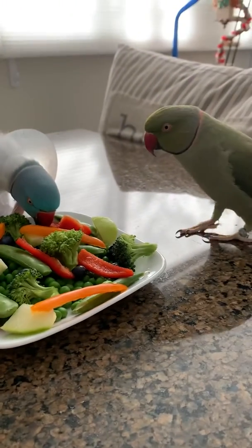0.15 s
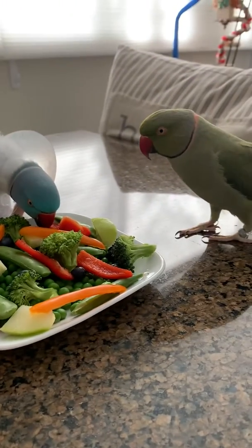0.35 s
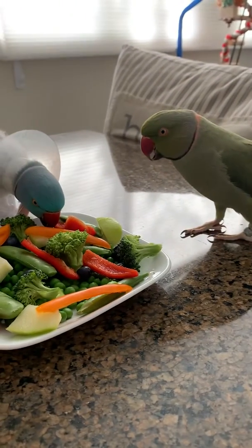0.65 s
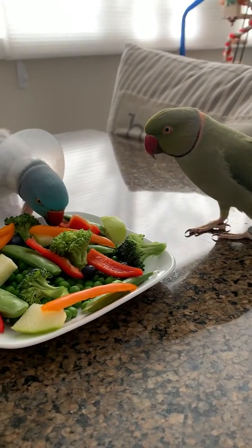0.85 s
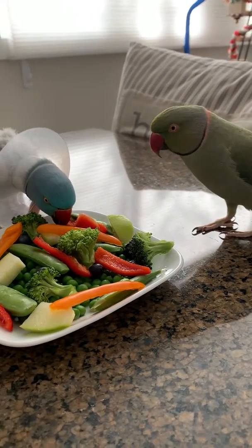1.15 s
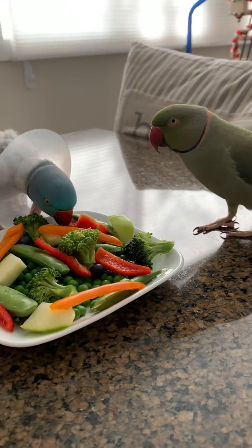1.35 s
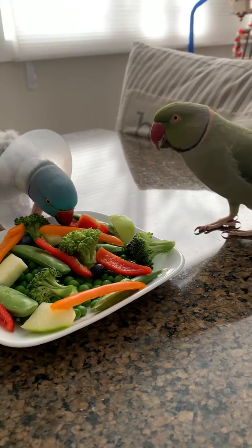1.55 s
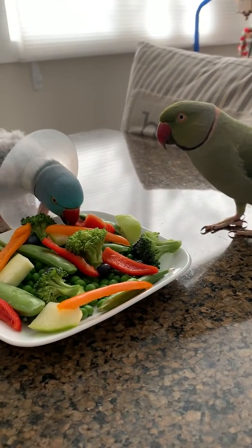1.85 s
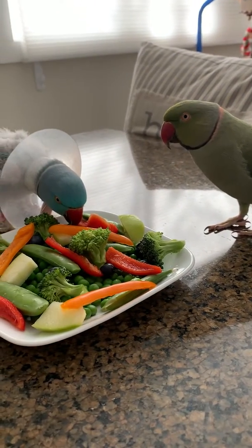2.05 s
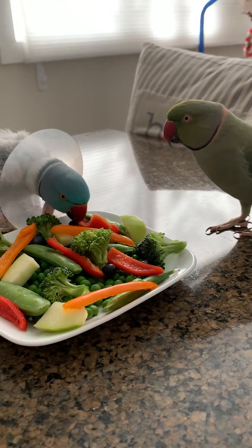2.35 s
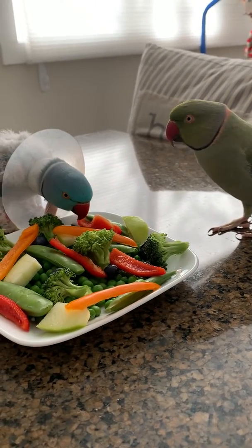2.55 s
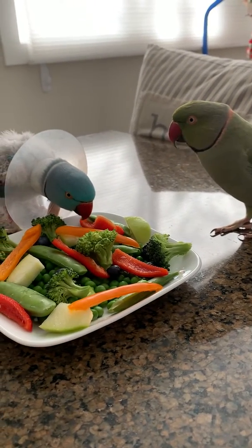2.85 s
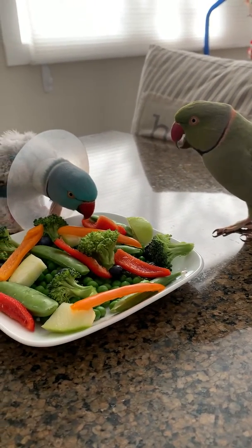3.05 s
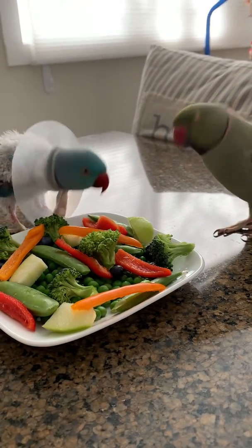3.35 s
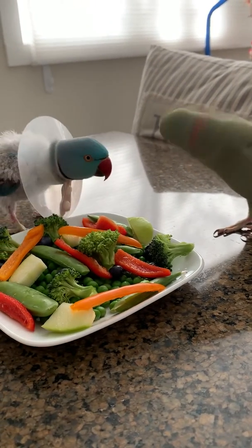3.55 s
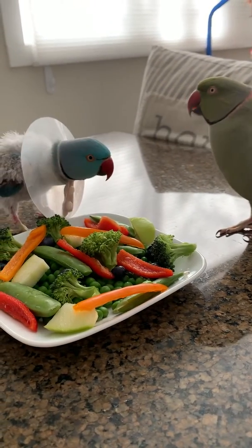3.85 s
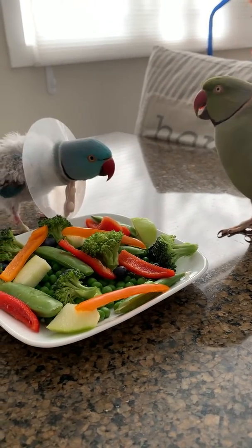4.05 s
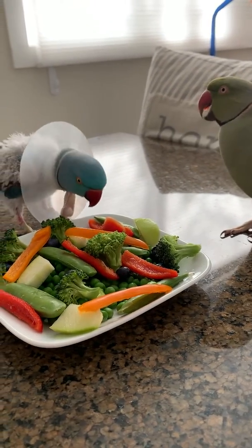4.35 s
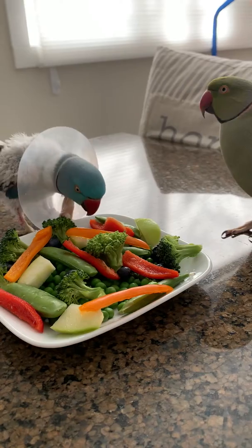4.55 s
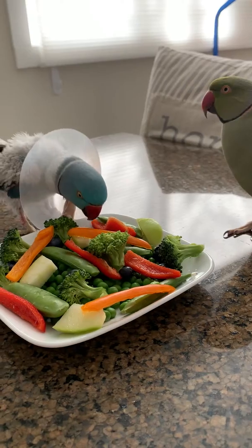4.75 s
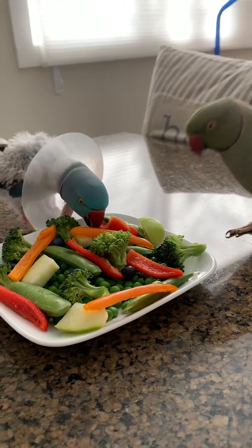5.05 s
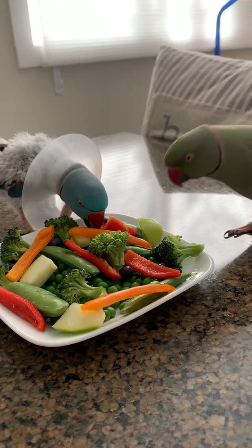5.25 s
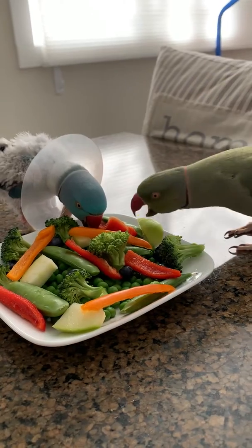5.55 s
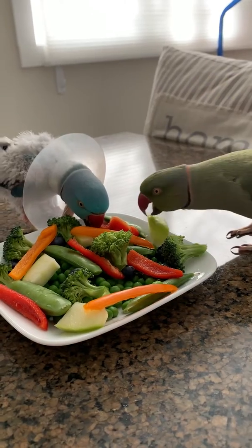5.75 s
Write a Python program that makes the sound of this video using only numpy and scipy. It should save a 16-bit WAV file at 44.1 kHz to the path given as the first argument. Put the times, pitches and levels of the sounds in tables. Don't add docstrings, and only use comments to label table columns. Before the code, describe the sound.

Close parrot calls, from soft peeps to a wide high squawk and a short rattle, with beak clicks, dish knocks and low fan hum.

```python
import sys
import numpy as np
from scipy import signal
from scipy.fft import rfft, irfft, next_fast_len
from scipy.io import wavfile
from scipy.ndimage import uniform_filter1d

SR = 44100
rng = np.random.default_rng(int(sys.argv[2]) if len(sys.argv) > 2 else 0)


def boost_factor(decibels):
    exponent = np.asarray(decibels, float) / 20
    return 10 ** exponent


def to_wav(s):
    ch = np.atleast_2d(s).T
    pcm = np.round(np.clip(ch, -1, 1) * 32767)
    wavfile.write(sys.argv[1], SR, pcm.astype(np.int16))


N = 259308


def rms_one(x):
    return x / np.sqrt(np.mean(x ** 2) + 1e-20)


def at_hz(points, hz):
    p = np.array(points, float)
    return np.interp(np.log(np.maximum(hz, 1)), np.log(p[:, 0] + 1), p[:, 1])


def stretch(rows):
    s, *columns = np.transpose(rows)
    t = np.arange(round(s[0] * SR), min(round(s[-1] * SR), N))
    return t[0], [np.interp(t / SR, s, c) for c in columns]


def drift(size, rate_hz):
    r = np.exp(-2 * np.pi * rate_hz / SR)
    return rms_one(signal.lfilter([1], [1, -2 * r, r * r], rng.standard_normal(size + 4000))[4000:])


def coloured(x, spectrum):
    size = next_fast_len(x.shape[-1] + 1024)
    gain = boost_factor(at_hz(spectrum, np.fft.rfftfreq(size, 1 / SR)))
    return irfft(rfft(x, size) * gain, size)[..., :x.shape[-1]]


def fade(size, seconds):
    ramp = np.minimum(np.arange(size), np.arange(size)[::-1]) / (seconds * SR)
    return np.minimum(ramp, 1)


def add(out, at, x):
    out[at:at + len(x)] += x[:len(out) - at]


# pitch_hz, level_db per Hz
ROOM_TONE = [(15, -33), (25, -3.5), (59, -4.5), (354, -3), (488, -11.5), (543, -14), (729, -17),
             (1630, -19.5), (1910, -22.5), (2300, -27.5), (3440, -30.5), (5420, -41), (9770, -61),
             (12100, -62.5), (15000, -70.5)]
# pitch_hz, likeness (1 same, -1 opposite)
LIKENESS = [(60, 0.96), (180, 0.99), (550, 0.25), (1650, -0.15), (4970, -0.26), (15000, -0.61)]
# pitch_hz, level_db rms
HUM = [(66, -46), (119, -51), (238, -54.5), (359, -53), (480, -54.5), (1865, -59)]


def room_tone():
    hz = np.fft.rfftfreq(N, 1 / SR)
    alike = np.clip(at_hz(LIKENESS, hz), -.95, .999)
    mid, side = rfft(rng.standard_normal((2, N))) * boost_factor(at_hz(ROOM_TONE, hz))
    both = irfft(np.sqrt(1 + alike) * mid + np.sqrt(1 - alike) * side * [[1], [-1]], N)
    t = np.arange(N) / SR
    hum = 0
    for f, level_db in HUM:
        waver = boost_factor(2.2 * drift(N, 9)) * np.sin(2 * np.pi * f * t + 1.1 * drift(N, 5))
        hum = hum + boost_factor(level_db + 43.5) * waver
    return boost_factor(1.0) * rms_one(both) + hum


# pitch_hz, level_db per Hz
HISS = [(2500, -30), (4000, -3), (7000, -8.5), (9000, -16), (11500, -18.5), (14000, -25), (16000, -38.5)]


def appliance_hiss():
    return boost_factor(-25 + 2.0 * drift(N, 6.4)) * rms_one(coloured(rng.standard_normal(N), HISS))


# start_s, pull_s, depth_db
DUCKS = [
    (.57, 0.085, -8.5),
    (1.602, 0.038, -13),
    (2.979, 0.29, -16.5),
    (4.099, 0.31, -7.5),
]


def gain_control():
    rest_db, sag_db_per_s = -40.5, -1.0444
    hold_s, recover_s = 0.07, 0.13
    t = np.arange(N) / SR
    dips = 0
    for s, pull_s, depth_db in DUCKS:
        corners = s + np.cumsum([0, pull_s, hold_s, recover_s])
        dips = dips + np.interp(t, corners, [0, depth_db, depth_db, 0])
    return boost_factor(rest_db + sag_db_per_s * t + dips)


# start_s, peak_db, ring_hz
TICKS = [(0.1547, -48, 5230), (0.3214, -44, 7310), (0.4424, -42, 5210), (0.4894, -60.5, 5290),
         (0.942, -48, 5400), (1.022, -42, 8100), (1.092, -23.5, 8570), (1.166, -6.5, 8200),
         (1.3077, -29, 6740), (3.6302, -38.5, 7440), (3.7823, -15, 6700), (5.479, -57, 5820),
         (5.661, -10.5, 6200), (5.683, -8, 5400)]


def ticks():
    out, t = np.zeros(N), np.arange(300) / SR
    high = signal.butter(2, 2500, "high", fs=SR, output="sos")
    for s, peak_db, ring_hz in TICKS:
        crack = signal.sosfilt(high, rng.standard_normal(300)) * np.exp(-t / 0.00014)
        ring = np.sin(2 * np.pi * ring_hz * t) * np.exp(-t / .0003)
        add(out, round(s * SR), boost_factor(peak_db) * (0.52 * crack + 1.2 * ring))
    return out


# pitch_hz, level_db
THROAT = [(400, -18.5), (800, -14.5), (1270, -3), (1700, -7), (2300, -7), (3300, -4), (4070, 5),
          (5000, 0.5), (6300, -5), (7600, -9.5), (9300, -5.5), (10500, -16.5), (12500, -24), (15500, -32.5)]


def syrinx(pitch, bright_db, jitter, shimmer_db, odd_db=0):
    phase = 2 * np.pi * np.cumsum(pitch * (1 + jitter * drift(len(pitch), 150))) / SR
    sound, power = 0, 1e-12
    for k in range(1, 19):
        gain_db = at_hz(THROAT, k * pitch) + bright_db * np.log2(k) + odd_db * (k % 2)
        gain = boost_factor(gain_db) * (k * pitch < 16000)
        power = power + gain ** 2 / 2
        shimmer = boost_factor(shimmer_db * drift(len(pitch), 82))
        sound = sound + gain * shimmer * np.sin(k * phase + k * k)
    return sound / np.sqrt(power)


# pitch_hz, level_db per Hz
BREATH = [(700, -57), (1300, -23), (2000, -4), (2600, -3), (3300, -13), (3950, -3), (5000, -1), (7250, -4),
          (9300, -13.5), (10400, -35), (12000, -31.5), (14000, -55.5)]


def breath(size):
    return rms_one(coloured(rng.standard_normal(size), BREATH))


# start_s, length_s, first_pitch_hz, last_pitch_hz, level_db
CHIPS = [
    (0.159, 0.023, 799, 474, -35.5),
    (1.305, 0.0051, 950, 726, -33),
    (1.483, 0.0046, 1264, 1243, -24),
    (1.507, 0.007, 1170, 1026, -21.5),
    (3.78, 0.006, 1509, 1162, -26.5),
    (3.9465, 0.0058, 1672, 2340, -11),
    (1.835, 0.012, 1944, 1774, -37.5),
    (5.474, 0.0099, 988, 766, -41.5),
    (5.658, 0.004, 1186, 1107, -17.5),
    (5.684, 0.004, 1750, 1682, -27.5),
]


def chips():
    out = np.zeros(N)
    for s, length_s, first_hz, last_hz, level_db in [*CHIPS, *rattle()]:
        bright_db = 11.5 * np.log2((first_hz + last_hz) / 2 / 1400)
        size = round(length_s * SR)
        abrupt = last_hz > 1.2 * first_hz
        swell = np.sin(np.pi * np.linspace(0, 1, size) ** (.45 if abrupt else .95)) ** 1.28
        odd_db = -5.5 * (first_hz > 1550)
        pitch = np.linspace(first_hz, last_hz, size)
        voice = syrinx(pitch, bright_db, jitter=.012, shimmer_db=2.2, odd_db=odd_db)
        add(out, round(s * SR), boost_factor(level_db + 1.5) * swell * voice)
        t = np.arange(-900, 900) / SR
        shape = np.exp(np.where(t < 0, t / .0022, -t / .005))
        rush = breath(1800) * shape
        add(out, round(s * SR) + size // 2 - 900, boost_factor(level_db - 13.0) * rush)
    return out


# start_s, pitch_hz, level_db
PEEP = [(.365, 1166, -51.5), (.379, 1178, -32.5), (.433, 1168, -26.5)]
# start_s, pitch_hz, level_db
CHIRP = [(.518, 1880, -41), (.524, 1730, -24), (.572, 1652, -20.5), (.598, 1850, -10.5), (.62, 1902, -15.5),
         (.65, 1966, -19), (.668, 1914, -34)]
# start_s, pitch_hz, level_db
SQUEAK = [(1.605, 1384, -26), (1.609, 1878, -11), (1.614, 2470, -17.5), (1.622, 1918, -11.5),
          (1.632, 1304, -15.5), (1.641, 972, -18), (1.65, 580, -37)]
# start_s, pitch_hz, level_db
LOW_ARCH = [(2.06, 601, -54.5), (2.12, 960, -43.5), (2.17, 1249, -36.5), (2.205, 1443, -37.5),
            (2.29, 1460, -26), (2.34, 1463, -23.5), (2.39, 1400, -25.5), (2.435, 1310, -18.5),
            (2.503, 1194, -20)]
# start_s, pitch_hz, level_db
HIGH_ARCH = [(2.848, 427.7, -36), (2.881, 1243, -29), (2.986, 1838, -13.5), (3.08, 2360, -17),
             (3.12, 2407, -23), (3.19, 2519, -18), (3.224, 2097, -18.5), (3.264, 1638, -26.5),
             (3.3, 834, -44)]
# start_s, pitch_hz, level_db
SLIDE = [(4.198, 1705, -33.5), (4.206, 1625, -25.5), (4.262, 1517, -27), (4.31, 1520, -25),
         (4.355, 1419, -27), (4.375, 1379, -21), (4.42, 1297, -21), (4.45, 1266, -25)]
# start_s, pitch_hz, level_db
RISE = [(5.795, 2004, -48), (5.823, 2060, -42.5), (5.843, 2310, -26.5), (5.855, 2733, -14.5),
        (5.88, 2897, -8)]


def calls():
    drop_s, drop_share, drop_db = .026, .6, -15
    opening_s, shut_db = 0.24, -6.5
    slack_hz, slack_db_per_octave = 1310, -5.5
    bright_per_db = 0.3945
    out = np.zeros(N)
    # (call, brightness at -25.5 dB in dB per octave, whether it ends in a drop)
    sung = [(PEEP, -11, True), (LOW_ARCH, -1, True), (SLIDE, 2.5, True), (CHIRP, -2.5, False),
            (HIGH_ARCH, 1.5, False), (RISE, -2.5, False), (SQUEAK, -2.5, False)]
    for rows, bright_db, drops in sung:
        at, (pitch, level_db) = stretch(rows)
        for _ in range(2):
            pitch = uniform_filter1d(pitch, size=len(pitch) // 18, mode="nearest")
        if drops:
            slackening = np.linspace(0, 1, round(drop_s * SR))
            pitch = np.append(pitch, pitch[-1] * drop_share ** slackening)
            level_db = np.append(level_db, level_db[-1] + drop_db * slackening)
        size = len(pitch)
        pitch = pitch * (1 + .003 * drift(size, 20))
        air = boost_factor(-42.0) * breath(size)
        octaves_under = np.maximum(np.log2(slack_hz / pitch), 0)
        slack_db = slack_db_per_octave * octaves_under * (rows is not SQUEAK)
        starts_shut = rows[0][1] < 700
        shut = np.clip(1.5 - 1.5 * np.arange(size) / SR / opening_s, 0, 1) * starts_shut
        tilt_db = bright_db + shut_db * shut + slack_db + bright_per_db * (level_db + 25.5)
        voice = syrinx(pitch, tilt_db, jitter=.0016, shimmer_db=1.7) + air
        edges = fade(size, 0.0014) if rows is not RISE else 1
        add(out, at, voice * boost_factor(level_db) * edges)
    return out


# start_s, peak_db, body_hz, decay_s
KNOCKS = [
    (0.442, -27, 1200, 0.0044),
    (1.165, -20, 1230, 0.0021),
    (1.308, -12, 750, 0.0042),
    (1.509, -21.5, 1020, 0.0035),
    (3.783, -12, 633, 0.0024),
    (5.477, -10, 676, 0.0039),
    (5.659, -3, 1240, 0.00336),
    (5.682, -11, 856, 0.0058),
]


def knocks():
    out, t = np.zeros(N), np.arange(1200) / SR
    for s, peak_db, body_hz, decay_s in KNOCKS:
        band = signal.butter(2, [1.0 * body_hz, 2.16 * body_hz], "band", fs=SR, output="sos")
        burst = signal.lfilter([1], [1, -.9], signal.sosfilt(band, rng.standard_normal(1200)))
        body = 1.1 * np.sin(2 * np.pi * body_hz * t)
        shape = np.minimum(t / 0.0016, 1) * np.exp(-t / decay_s)
        add(out, round(s * SR), boost_factor(peak_db - 15.0) * shape * (rms_one(burst) + body))
    return out


# start_s, held_s, level_db, first_resonance_hz, last_resonance_hz
PUFFS = [
    (1.823, 0.0091, -37, 3840, 3562),
    (1.86, 0.12, -35.5, 3280, 2944),
    (2.51, 0.055, -35, 3655, 3325),
    (2.611, 0.033, -36.5, 3442, 2886),
    (3.928, 0.026, -38, 3857, 3870),
    (4.061, 0.12, -37, 3870, 4160),
    (4.46, .01, -30, 4166, 4087),
    (4.545, 0.037, -27, 3890, 3762),
]


def puffs():
    swell_s, swell_db, dying_s, dying_db = .03, 9, 0.14, -27
    # (ratio to the main resonance, level dB)
    streaks = [(.55, -16.5), (.68, -18.5), (1, -6), (1.45, -23.5), (1.75, -7.5), (2.1, -21.5), (2.5, -14.5)]
    out = np.zeros(N)
    for s, held_s, puff_db, first_hz, last_hz in PUFFS:
        corners = s + np.cumsum([0, swell_s, held_s, dying_s])
        levels = puff_db + np.array([swell_db, 0, 0, dying_db])
        resonance = [first_hz, first_hz, last_hz, last_hz]
        at, (level_db, hz) = stretch(np.transpose([corners, levels, resonance]))
        size = len(hz)
        sound = boost_factor(-6) * breath(size)
        turn = 2 * np.pi * np.cumsum(hz) / SR
        for ratio, streak_db in streaks:
            strength = boost_factor(streak_db + 3 * drift(size, 8)) * drift(size, 85)
            sound = sound + strength * np.sin(ratio * turn)
        add(out, at, boost_factor(level_db + 1.1 * drift(size, 37)) * fade(size, 0.035) * sound)
    return out


# start_s, length_s, level_db
RATTLE = [
    (4.048, .006, -15.5),
    (4.0675, .0095, -10),
    (4.089, .009, -10),
    (4.1085, .009, -14.5),
    (4.1295, .009, -14),
    (4.152, .007, -19),
]


def rattle():
    pitch_hz, sweep_hz = 1850, 645
    rows = []
    for k, (s, length_s, level_db) in enumerate(RATTLE):
        share = 1 if k > 1 else 0.27 * k
        rows.append((s, length_s, pitch_hz, pitch_hz + sweep_hz * share, level_db))
    return rows


# pitch_hz, width_hz, level_db
WINDPIPE = [(2640, 130, 4), (4063, 301, 4), (5910, 320, -0.5), (7080, 3300, -1.5)]


def windpipe(x):
    size = next_fast_len(N + 1024)
    hz = np.fft.rfftfreq(size, 1 / SR)
    bells_db = sum(db / (1 + (2 * (hz - f) / width) ** 2) for f, width, db in WINDPIPE)
    return irfft(rfft(x, size) * boost_factor(bells_db), size)[:N]


def early(x):
    taps = np.zeros((2, 1400))
    for side in taps:
        when = rng.integers(150, 1400, 40)
        side[when] = rng.standard_normal(40) * np.exp(-when / SR / 0.015)
    return signal.fftconvolve(x[None], taps, axes=1)[:, :N]


# pitch_hz, decay_s
ROOM_T60 = [(300, 0.16), (2000, 0.33), (5000, 0.35), (12000, 0.23)]


def room(x):
    size = next_fast_len(N + SR)
    hz = np.fft.rfftfreq(size, 1 / SR)
    wet = np.zeros((2, len(hz)), complex)
    for k, lag_s in enumerate(rng.uniform(.011, .04, 20)):
        loop = boost_factor(-60 * lag_s / at_hz(ROOM_T60, hz)) * np.exp(-2j * np.pi * hz * lag_s)
        wet[k % 2] += loop / (1 - loop) * (-1) ** (k // 2)
    for lag_s in (.0011, .0029, .0047):
        turn = np.exp(-2j * np.pi * hz * lag_s)
        wet = wet * (turn - .6) / (1 - .6 * turn)
    return irfft(rfft(x, size) * wet, size)[:, :N]


# delay_s, level_db
ECHOES = [
    (.00035, -31),
    (.007, -16.5),
]
# pitch_hz, left_minus_right_db
PORTS = [(1000, 3), (1500, -2), (2000, -3.5), (3700, 2.5), (4700, -8.5), (6200, 2.5), (7000, 0.2)]
# pitch_hz, lag_turns
RIGHT_BEHIND = [(0, 0), (1800, 0), (2700, .19), (3700, .14), (4900, .5), (7100, 1), (9800, 1.5), (12500, 2),
                (15100, 2.5), (22050, 3.8)]


def ports(x):
    size = next_fast_len(N + 2048)
    hz = np.fft.rfftfreq(size, 1 / SR)
    paths = 1 + sum(boost_factor(db) * np.exp(-2j * np.pi * hz * delay_s) for delay_s, db in ECHOES)
    half_level = at_hz(PORTS, hz) / 2 * np.log(10) / 20
    half_phase = np.pi * np.interp(hz, *np.transpose(RIGHT_BEHIND))
    half = half_level + 1j * half_phase
    return irfft(rfft(x, size) * paths * np.exp(half * np.array([[1], [-1]])), size)[:, :N]


# pitch_hz, level_db
DIFFUSE = [(400, -16), (1000, -38), (2500, -15.5), (3600, -29.5), (6000, -37.5), (12000, -64)]


def scene():
    bird = windpipe(calls() + chips() + puffs()) + ticks() + knocks()
    gain = gain_control()
    wet = gain * room(bird / gain)
    hiss = gain * appliance_hiss()
    around = coloured(wet[::-1] + boost_factor(9.5) * early(bird), DIFFUSE)
    near = bird + boost_factor(-19) * early(bird)[0] + boost_factor(-23.5) * wet[0] + hiss
    return ports(near) + around + gain * room_tone()


def band_limit(x):
    return signal.sosfilt(signal.butter(12, 15640, fs=SR, output="sos"), x)


def record(dry):
    thin = signal.sosfilt(signal.butter(2, 36, "high", fs=SR, output="sos"), dry)
    rounded = np.tanh(thin / .98) * .98
    return band_limit(rounded)


dry = scene()
out = record(dry)
to_wav(out)
```